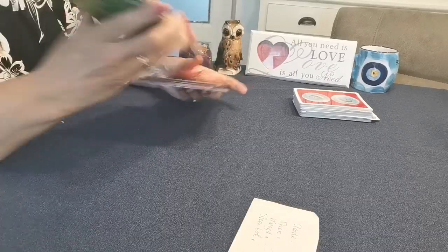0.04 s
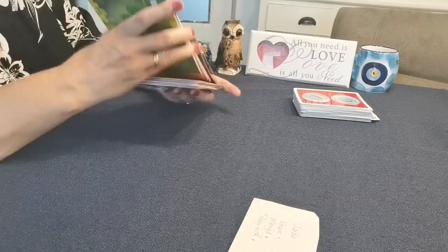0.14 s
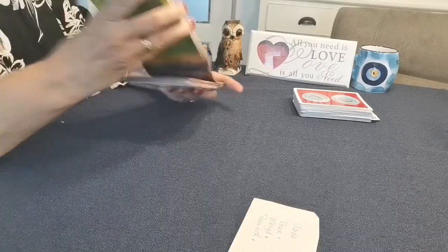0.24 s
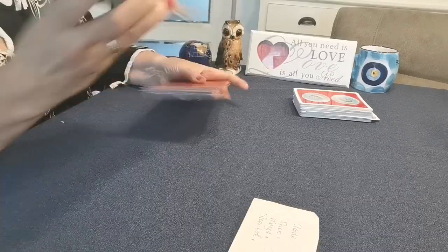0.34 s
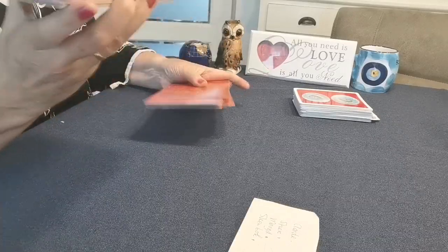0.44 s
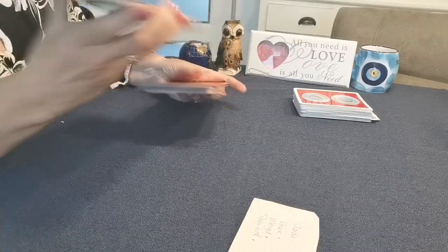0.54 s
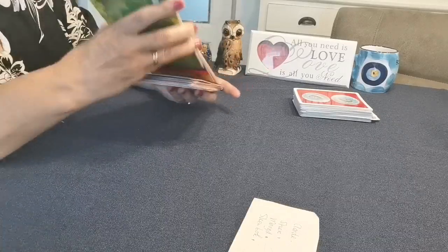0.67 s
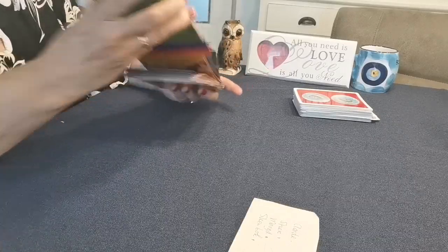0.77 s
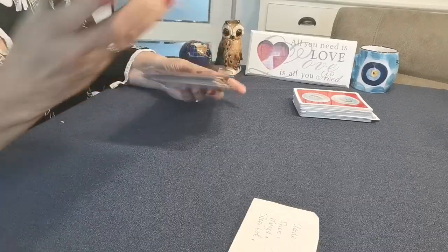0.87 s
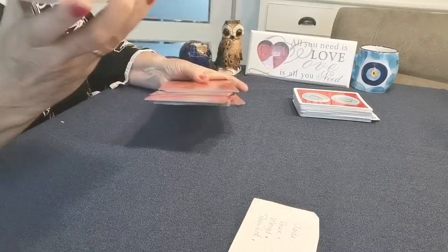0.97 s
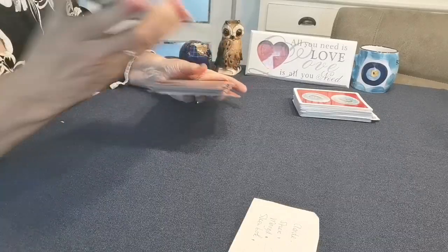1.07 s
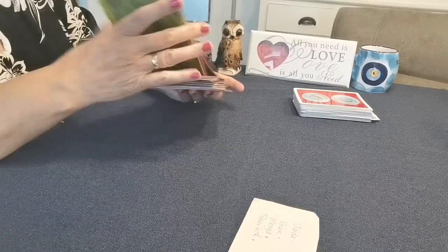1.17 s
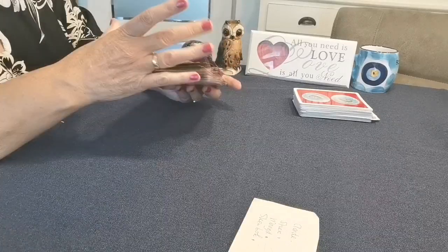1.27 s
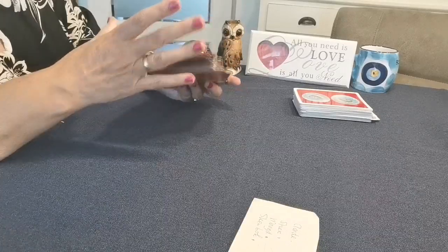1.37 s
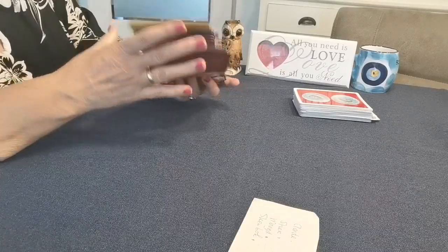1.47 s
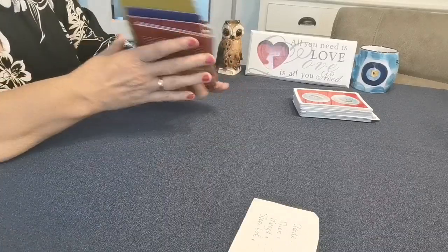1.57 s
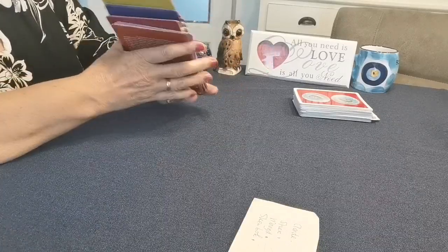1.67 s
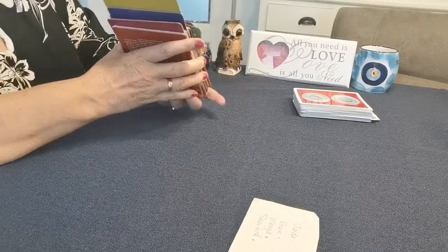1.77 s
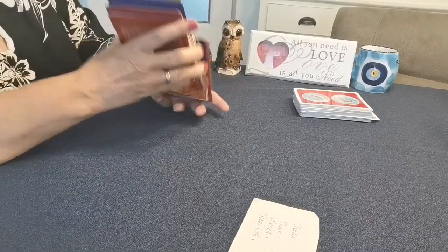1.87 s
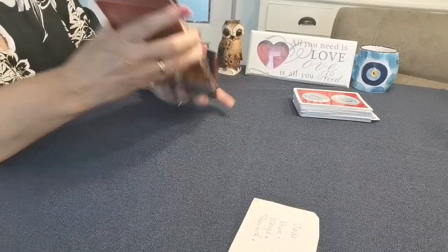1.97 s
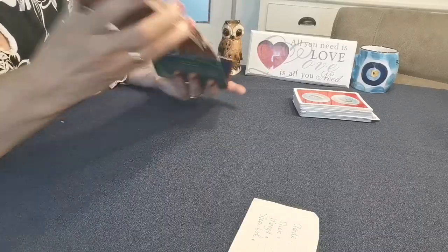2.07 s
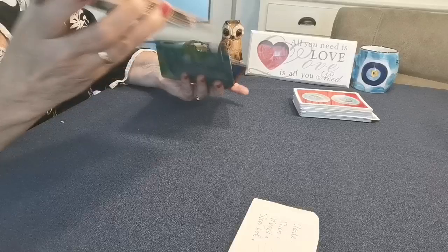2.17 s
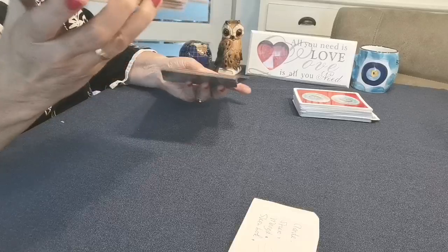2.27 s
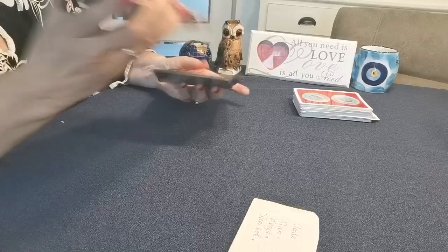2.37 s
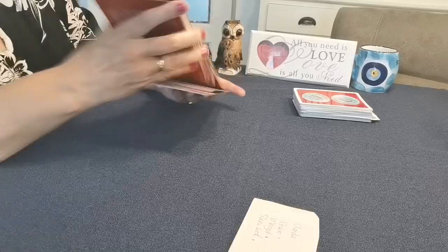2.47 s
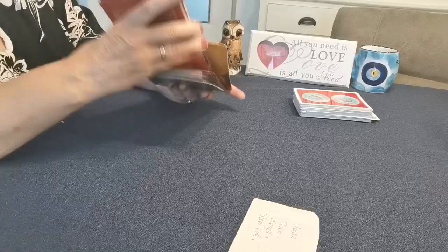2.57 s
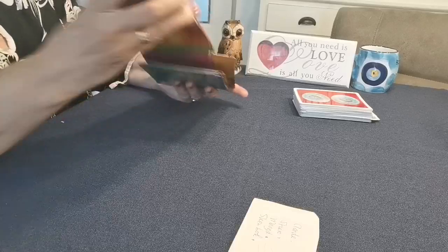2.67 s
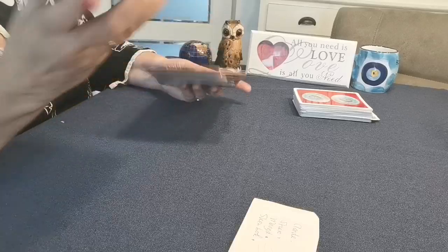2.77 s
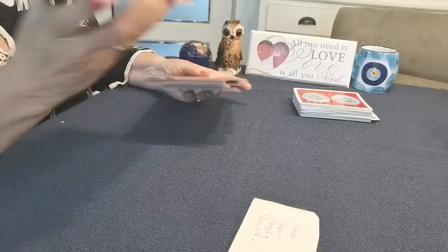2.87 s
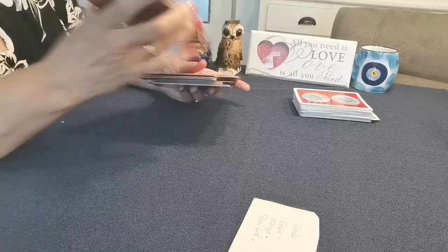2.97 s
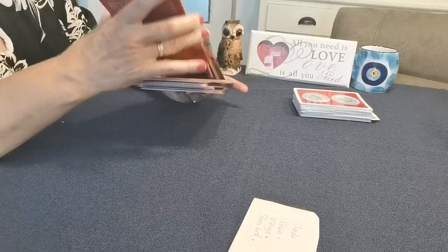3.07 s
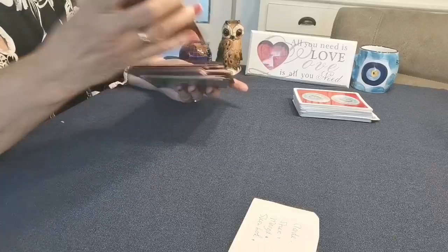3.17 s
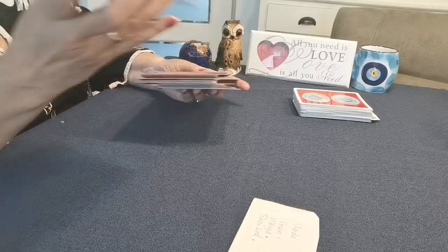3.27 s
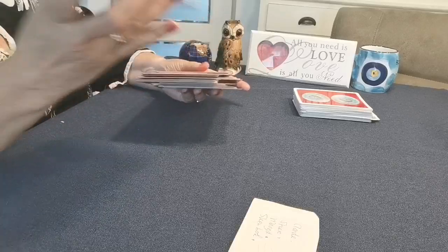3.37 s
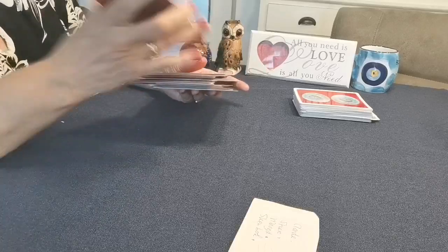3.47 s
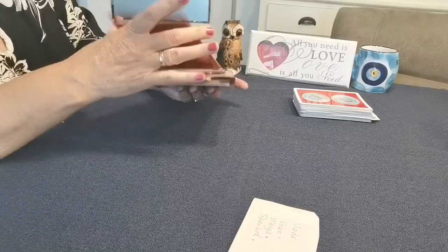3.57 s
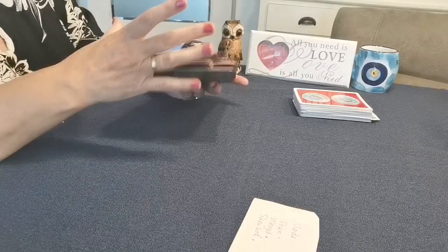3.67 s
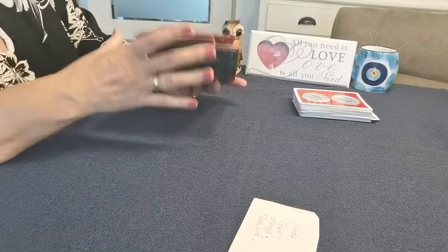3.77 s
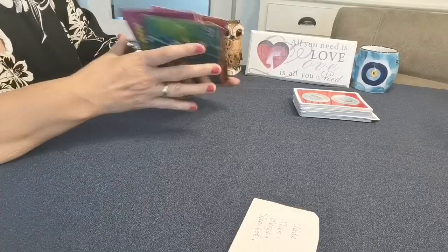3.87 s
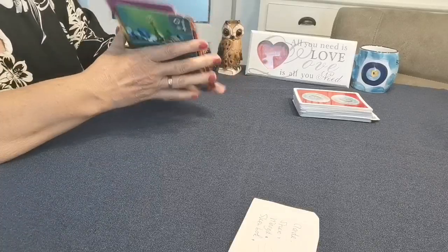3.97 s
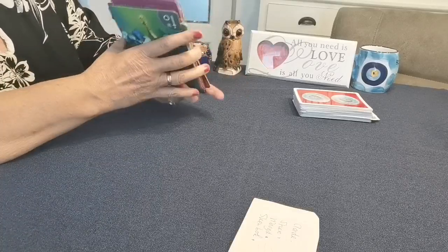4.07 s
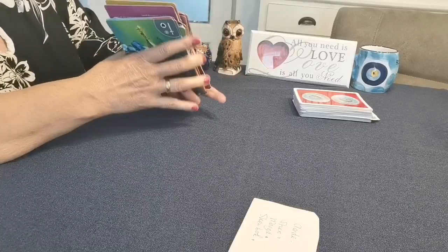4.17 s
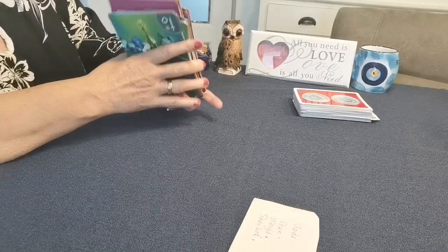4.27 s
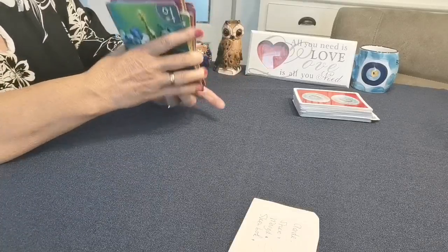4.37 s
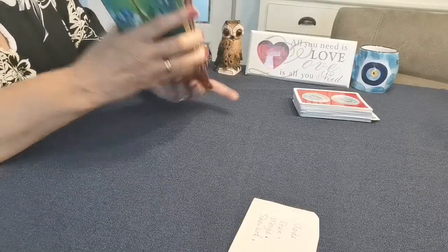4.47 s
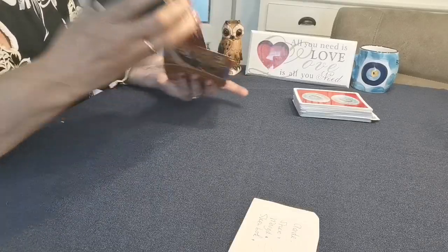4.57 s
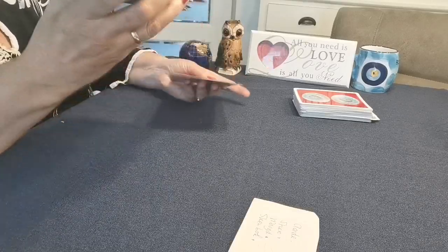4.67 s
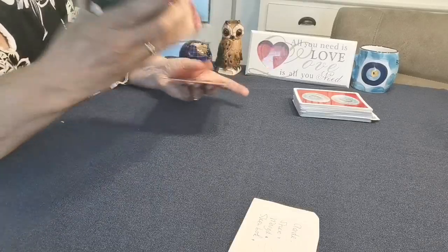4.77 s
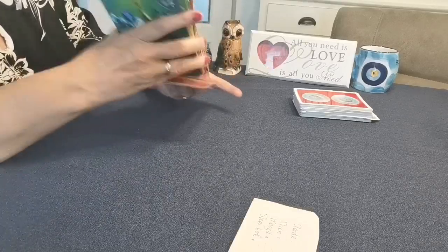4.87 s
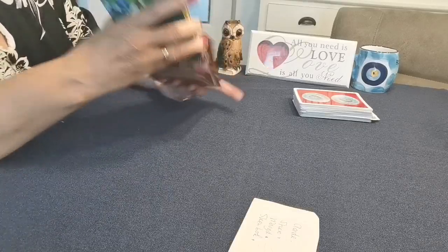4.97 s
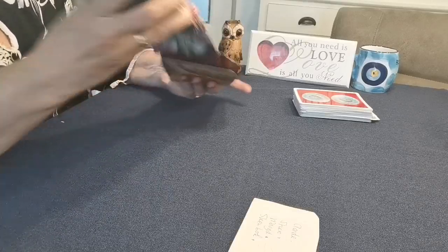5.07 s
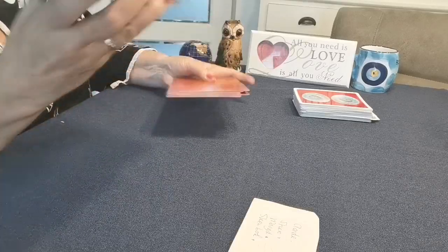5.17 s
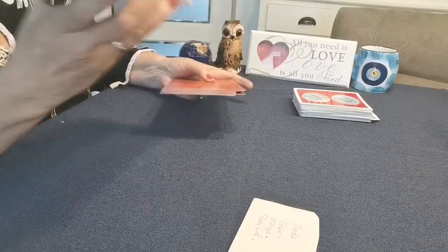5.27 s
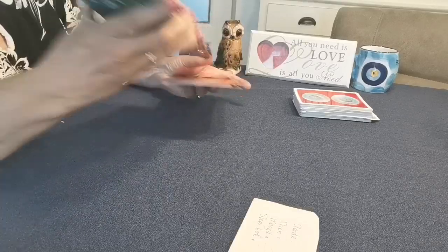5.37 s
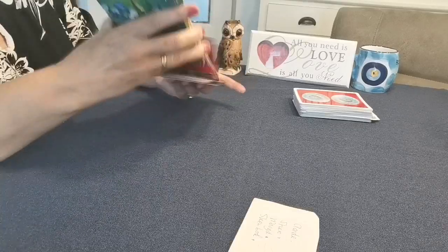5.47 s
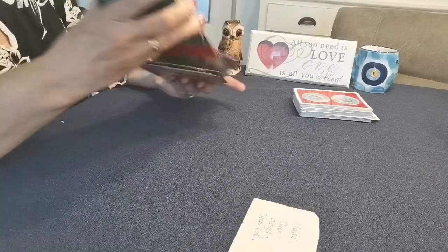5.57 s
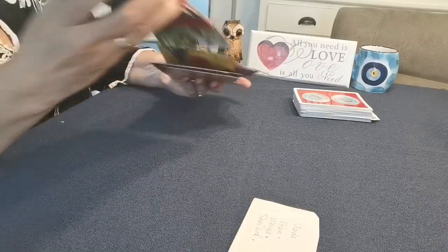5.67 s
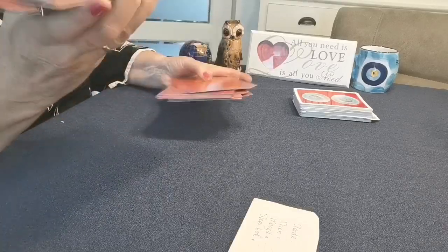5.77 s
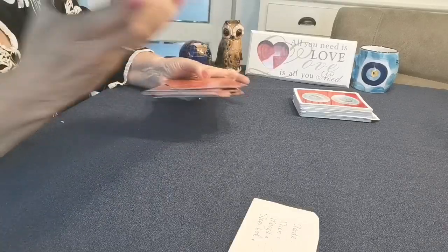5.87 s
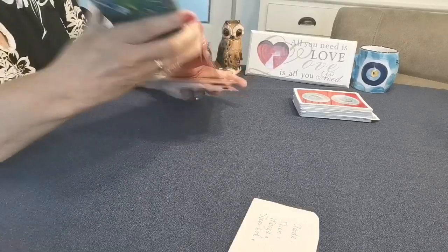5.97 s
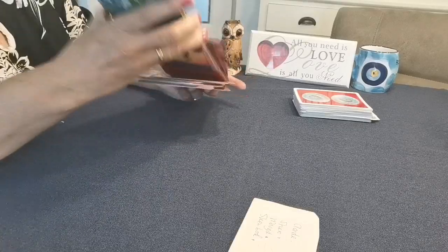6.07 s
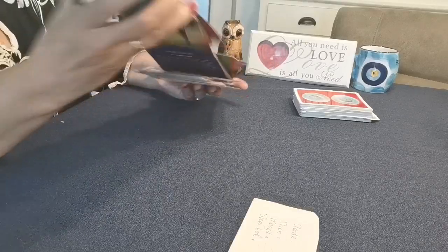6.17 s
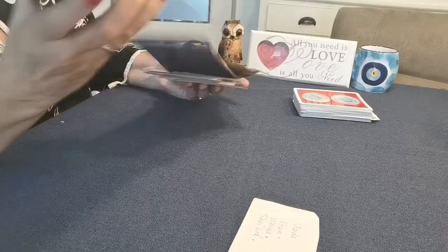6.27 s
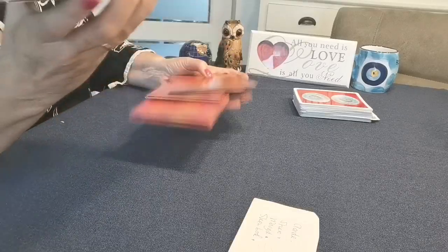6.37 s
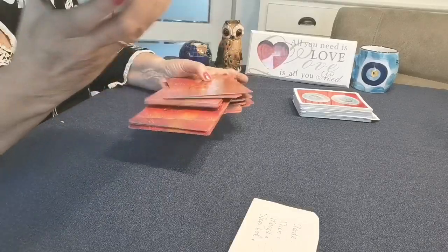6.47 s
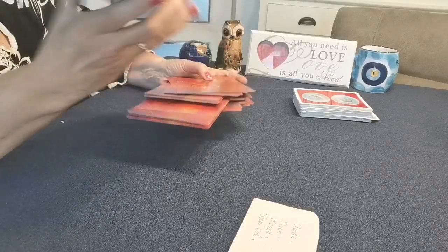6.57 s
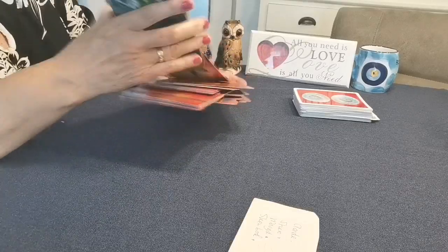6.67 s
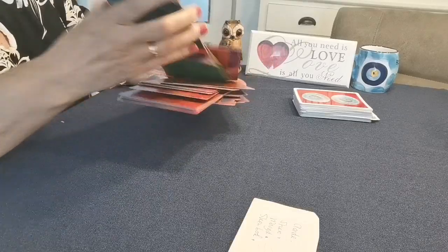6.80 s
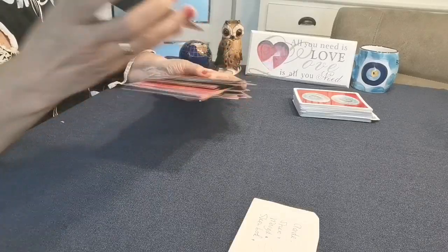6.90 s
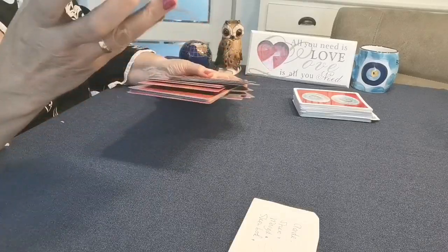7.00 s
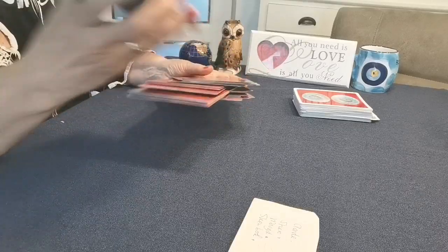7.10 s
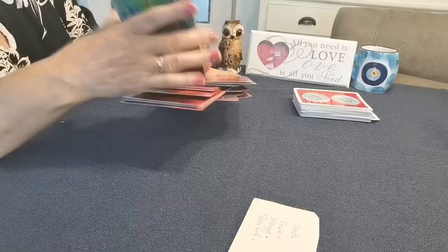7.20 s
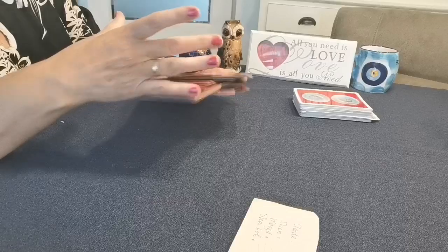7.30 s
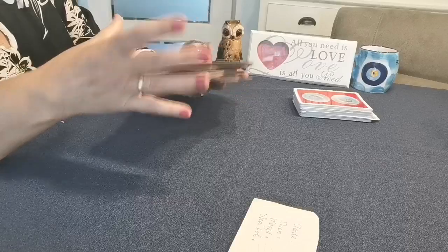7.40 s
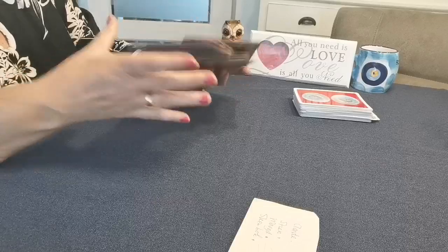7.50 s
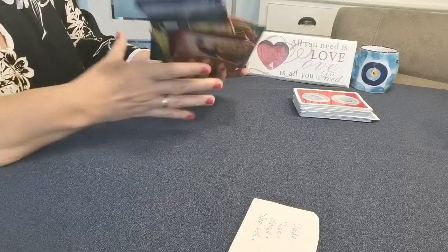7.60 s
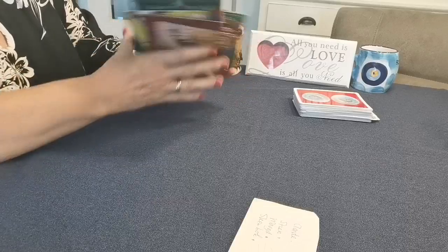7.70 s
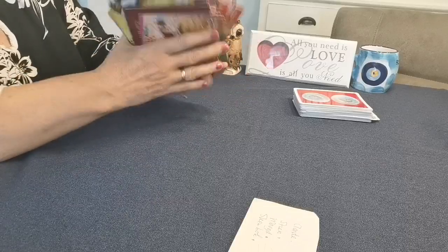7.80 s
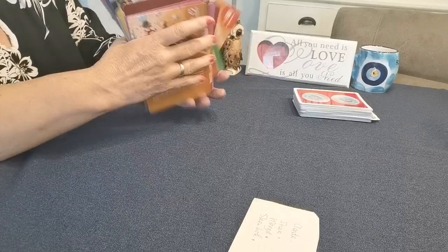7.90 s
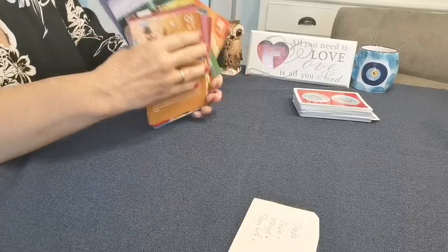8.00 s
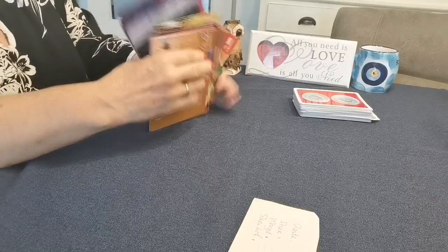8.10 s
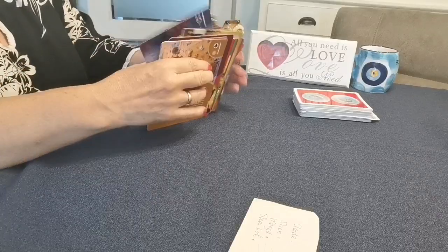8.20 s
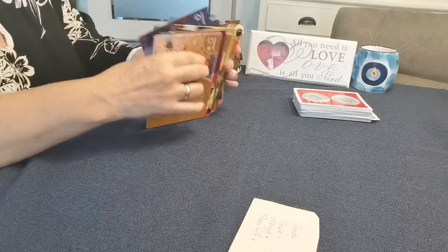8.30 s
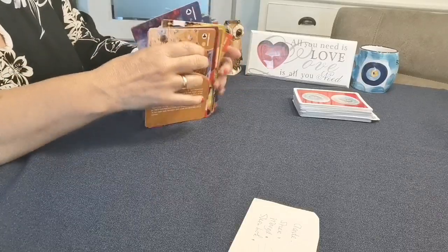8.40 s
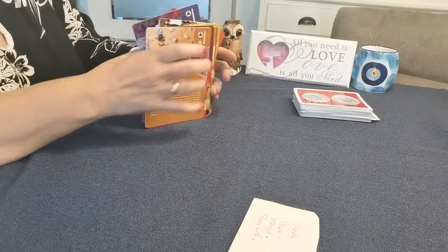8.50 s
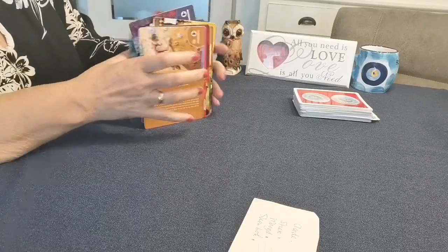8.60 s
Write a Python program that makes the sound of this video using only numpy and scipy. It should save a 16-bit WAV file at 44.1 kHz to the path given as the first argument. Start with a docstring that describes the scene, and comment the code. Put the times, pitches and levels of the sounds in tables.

```python
"""Overhand shuffle, close by

A deck of large coated cards is shuffled overhand, close to a stereo microphone in a furnished room.
Packets slap down as short bursts ringing air, hand and edge; then they slide with a grainy swish of shaped noise.
Edges tick, and knocks ring the dull modes of pile and palm. Faint airy whistles are narrow bands of noise.
Decaying noise makes the reflections of the room; a wavering low hum and steady hiss lie below."""
import sys
import numpy as np
from scipy import signal
from scipy.io import wavfile

SR = 44100
rng = np.random.default_rng(int(sys.argv[2]) if len(sys.argv) > 2 else 0)


def inscribe(sig):
    """Save sig as 16-bit PCM at rate SR to the path in sys.argv[1].

    A 1-D sig is mono; a 2-D sig holds one channel per row.
    Samples are clipped to [-1, 1] before scaling.
    """
    pcm = np.round(np.clip(np.atleast_2d(sig).T, -1, 1) * 32767)
    wavfile.write(sys.argv[1], SR, pcm.astype(np.int16))


N = 381332

# spectrum of coating sliding on coating: (frequency [Hz], relative level [dB per Hz])
SWISH_SPECTRUM = [(900, -28.5), (2000, -2.5), (3000, 1.5), (4500, 3.5), (6500, 3.5), (9000, 13),
                  (11500, 10.5), (15000, 8)]


def from_db(db):
    """Gain of a level."""
    return 10 ** (np.asarray(db) / 20)


def rms_one(x):
    """Scaled to unit power."""
    return x / np.sqrt(np.mean(x ** 2) + 1e-20)


def at_hz(points, hz):
    """A curve over frequency, read on a log-frequency axis."""
    points = np.array(points)
    return np.interp(np.log(hz), np.log(points[:, 0]), points[:, 1])


def sides(pan_db):
    """Left and right gains for a left-right level difference."""
    return from_db(np.array([pan_db / 2, -pan_db / 2]))


def hand_sides():
    """Left and right gains at every sample as the hands move across the microphone pair."""
    # where the hands are: (time [s], left-right difference [dB])
    hand_pan = [(0, -3), (.6, 3.5), (3, 3), (5, 1), (8.65, -1)]
    s, pan_db = np.transpose(hand_pan)
    return sides(np.interp(np.arange(N) / SR, s, pan_db))


def drift(rate_hz):
    """Slow chance of spread 1: noise through two equal low-pass poles, drawn at every eighth sample."""
    r = np.exp(-2 * np.pi * rate_hz * 8 / SR)
    noise = rng.standard_normal((N + SR) // 8 + 2)
    slow = signal.lfilter([1], [1, -2 * r, r * r], noise)[SR // 8:]   # the filter has settled by here
    return np.interp(np.arange(N) / 8, np.arange(len(slow)), rms_one(slow))


def ring(x, hz, t60):
    """A two-pole resonance: a unit click starts a decaying sine of starting height 1."""
    r, w = from_db(-60 / (t60 * SR)), 2 * np.pi * hz / SR
    return signal.lfilter([0, np.sin(w)], [1, -2 * r * np.cos(w), r * r], x + 1e-18)


def coloured(spectrum, grain_db, patchy_db, ticks=0):
    """Stereo noise shaped in half-octaves, lumpy with stick-slip grains and band-wise flicker; rms 1."""
    # how alike the two microphones hear it: (frequency [Hz], left-right correlation)
    likeness = [(30, 0.018), (250, 0.6), (700, 0.13), (2000, 0.025), (5000, 0.085), (12000, 0.03)]
    # balance of the microphone pair: (frequency [Hz], left-right difference [dB])
    tilt = [(60, -2), (180, 0), (550, 0.5), (1650, 1), (4970, -2), (15000, -1)]
    white = (rng.standard_normal((2, 2, N)) + ticks) * from_db(grain_db * drift(240))
    flicker = [drift(17) + 0.4 * drift(4) for _ in range(4)]
    edges = 22 * 2 ** np.arange(0, 10, 0.5)
    out = 0
    for k, (low, high) in enumerate(zip(edges, edges[1:])):
        hz = np.sqrt(low * high)
        level_db = at_hz(spectrum, hz)
        if level_db < -50:   # too faint to matter
            continue
        band = signal.butter(2, [low, high], "band", fs=SR, output="sos")
        mid, side = signal.sosfilt(band, white[k % 2])
        alike = np.clip(at_hz(likeness, hz), -1, 1)
        pair = np.sqrt(1 + alike) * mid + np.sqrt(1 - alike) * side * [[1], [-1]]
        gain = from_db(level_db + patchy_db * flicker[k // 2 % 4])   # neighbouring bands flicker together
        out = out + gain * sides(at_hz(tilt, hz))[:, None] * pair
    return rms_one(out)


def slaps():
    """A click and a brief noise burst ring the air between the cards, thud in the hand and snap at the edge."""
    # slaps and edge ticks: (time [s], level of the air ring [dB], ring of the trapped air [Hz],
    # thud level relative to the air ring [dB], snap level relative to the air ring [dB])
    slap_rows = [(0.224, -33, 755, 9, 9), (0.388, -35.5, 3120, -2, -8), (0.4669, -16.5, 2870, -10.5, -3),
                 (0.4845, -27.5, 596, -7, -20), (0.4862, -24.5, 3060, 3.5, 11.5),
                 (0.4875, -18.5, 9100, -10, -10), (0.4949, -25.5, 930, -29, -20),
                 (0.763, -39, 2200, -14, 4), (0.775, -21.5, 2340, -9.5, 1), (0.819, -31.5, 2280, -30, -6),
                 (0.866, -34.5, 3540, -25, -23), (0.894, -37, 1770, -36, -23), (0.996, -27, 1840, -3.5, 6),
                 (0.999, -34, 3500, -17, -16), (1.0238, -21.5, 4200, -9, -2.5),
                 (1.026, -29.5, 4100, -30, -23), (1.315, -34.5, 3760, -2.5, -12),
                 (1.368, -38, 1200, -5, -6), (1.3725, -36, 810, -5, 17), (1.3789, -30.5, 1310, -21, 7),
                 (1.429, -37.5, 930, 0.5, -14), (1.819, -68.5, 4000, -20, 8),
                 (2.045, -47.5, 4040, -10, 11.5), (2.268, -39, 2880, -35, -11),
                 (2.269, -37.5, 1350, -4.5, 7), (2.345, -55.5, 7640, -32, 12), (2.576, -42, 4470, 6.5, -8),
                 (2.596, -41, 2010, -8, 0), (2.611, -31, 1520, -2.5, 4), (2.8006, -29, 3060, -41, -34),
                 (2.805, -31, 3100, -22, -8), (2.836, -20.5, 1680, -37, -4), (2.842, -29.5, 1460, 3, 4),
                 (2.855, -30.5, 3170, -3, -15), (2.87, -33, 860, -16, -22), (2.948, -39, 2200, -33, -47.5),
                 (3.185, -30.5, 2700, -2, 10), (3.211, -33.5, 2000, -8, -10), (3.276, -38, 900, 0.5, 9),
                 (3.288, -26.5, 720, -11, -30), (3.627, -37.5, 7450, -11, -16), (3.713, -48, 7700, -4, 3),
                 (3.761, -55, 820, 16, -34), (4.476, -50, 1780, 1, -1), (4.539, -50, 1040, -16, -13),
                 (4.716, -30, 2450, -3.5, -25), (4.717, -29.5, 1380, -10.5, 2),
                 (4.7254, -34, 1570, -7, -16), (4.813, -41.5, 1400, -8, -34),
                 (4.9974, -15.5, 2040, -52, -4.5), (4.9976, -16, 3690, -43, -3),
                 (4.998, -29, 1400, -41.5, -30), (4.999, -19, 2240, -43, -30),
                 (5.006, -24.5, 1550, -40, -13), (5.008, -27, 1540, -35, -19),
                 (5.054, -39.5, 7600, -24, 12.5), (5.2224, -29.5, 4000, -41, 10),
                 (5.233, -38.5, 1400, -19, 9), (5.236, -34, 710, -10.5, -8), (5.525, -49, 2790, 6, 20),
                 (5.637, -41, 3530, 6.5, -24), (5.652, -36, 3390, -31, -11), (5.785, -27.5, 2350, -9.5, -1),
                 (5.8183, -26.5, 1800, -8.5, 0), (5.8196, -31, 2700, -8, -7), (5.834, -32.5, 1010, -29, 9),
                 (6.097, -55, 1770, -21, 19.5), (6.169, -50.5, 900, 2.5, -21), (6.219, -41, 3020, -18, 5),
                 (6.263, -39.5, 1770, -9, 8), (6.3, -38.5, 1560, 0.5, -17), (6.377, -24, 2130, -8, -4),
                 (6.39, -35, 2040, -20, 4), (6.412, -44, 2000, -21.5, 7), (6.781, -31.5, 520, -9, -8.5),
                 (6.783, -25, 3300, -26, 2.5), (6.826, -40, 7800, -14, -3), (6.904, -36, 2630, -7.5, -2),
                 (7.003, -53, 596, 3, -18.5), (7.324, -44, 2720, -7.5, -12), (7.431, -51.5, 840, 8, 1),
                 (7.819, -56.5, 1177, 1, -14.5), (7.841, -56, 7460, -33, -1), (7.942, -49, 2490, -20, -6),
                 (7.98, -44, 2060, -1, -10), (8.243, -65, 3000, -20, 4), (8.458, -38.5, 1040, -36, 2),
                 (8.469, -47.5, 3700, 6, -8)]
    air_t60_s = 0.003   # for a pocket ringing at 1500 Hz
    snap_band_hz, snap_s = (1300, 14300), 0.0014   # the crack of the card edge
    out, pan = np.zeros((2, N + SR)), hand_sides()
    t = np.arange(SR // 20) / SR
    click = t == 0
    edge = signal.butter(1, snap_band_hz, "band", fs=SR)
    all_grit = rng.standard_normal((len(slap_rows), 3, len(t)))
    for (s, db, hz, thud_db, snap_db), grit in zip(slap_rows, all_grit):
        shared, apart = grit[0], grit[1:]   # noise common to both sides, and one for each side
        contact = (shared + 0.5 * apart) * np.exp(-t / 0.00056) * 0.12 + click

        t60 = air_t60_s * (1500 / hz) ** 0.3   # small high pockets die sooner
        ringing = ring(ring(contact, hz, t60), hz, t60)   # twice: a soft rise and a narrow band
        overtone = ring(contact, 2.0 * min(hz, 5000), air_t60_s / 2)
        air = ringing / np.abs(ringing).max() + 0.19 * overtone

        push = shared * np.exp(-t / 0.0072) * 0.1 + click
        thud = ring(push, 560, 0.0038) + 0.4 * ring(push, 380, 0.0082) + 0.18 * ring(push, 110, 0.019)

        snap = signal.lfilter(*edge, (shared + apart) * np.exp(-t / snap_s) + 1.4 * click)
        snap = snap / np.abs(snap).max()

        blow = air + from_db(thud_db) * thud + from_db(snap_db) * snap
        at = round(s * SR)
        out[:, at:at + len(t)] += from_db(db) * blow * pan[:, [at]]
    return out[:, :N]


def sliding():
    """Coating rubs on coating with a bright swish while the packet bends with a duller rustle."""
    # spectrum of the bending packet: (frequency [Hz], relative level [dB per Hz])
    flex_spectrum = [(90, -20.5), (200, 1), (500, 4), (1200, 4), (2200, 2.5), (4000, -4.5)]
    scrape_share = 0.39   # weight of the scrapes beside the noise
    split_hz = 5170   # a light touch excites mostly the swish above this, a firm one its body too
    ticks = edge_ticks(per_s=200, size_db=11.5)
    swish = coloured([(300, -85.0)] + SWISH_SPECTRUM, grain_db=0.5, patchy_db=2.5, ticks=ticks)
    swish = swish + scrape_share * scrapes()
    rustle_spectrum = [(40, -61.5)] + flex_spectrum + [(9000, -67.5)]
    rustle = coloured(rustle_spectrum, grain_db=2.5, patchy_db=1.0, ticks=ticks)
    top = signal.sosfilt(signal.butter(3, split_hz, "high", fs=SR, output="sos"), swish)
    body = signal.sosfilt(signal.butter(3, split_hz, "low", fs=SR, output="sos"), swish)
    top_gain, body_gain, rustle_gain = sliding_gains()
    return (top_gain * top + body_gain * body + rustle_gain * rustle) * hand_sides()


def sliding_gains():
    """Gains of swish top, swish body and rustle: jolts start abruptly and fade, rubs are bells; powers add."""
    # a landing jolts the cards into sliding, and the slide dies away:
    # (time [s], swish level before burst and fade [dB], rustle level before burst and fade [dB])
    jolt_rows = [(0, -49, -52), (0.222, -33.5, -50.5), (0.467, -36.5, -39), (.765, -44, -52),
                 (0.772, -33.5, -54.5), (0.995, -44.5, -48), (1.297, -45.5, -57.5), (1.379, -41, -45.5),
                 (2.266, -53, -62), (2.572, -31, -45), (2.834, -38.5, -41), (3.126, -37, -42.5),
                 (3.286, -50, -54.5), (3.625, -50, -67), (3.761, -58.5, -59.5), (4.713, -50, -47),
                 (5.001, -39, -42), (5.234, -47, -50.5), (5.608, -43.5, -52.5), (5.815, -46.5, -50.5),
                 (6.098, -51, -61), (6.378, -49.5, -51), (6.783, -35, -45.5), (7.326, -56, -61),
                 (7.433, -58, -63), (8.455, -56, -60)]
    # fingers push cards along each other, swelling and fading: (peak time [s], half-width to 1/e [s],
    # swish top level [dB], swish body level relative to top [dB], rustle level [dB])
    rub_rows = [(.16, 0.072, -68, 6, -77), (.285, 0.03, -50, 0, -45), (0.342, 0.016, -37.5, 3, -53),
                (.42, 0.056, -38.5, -1.5, -58.5), (.458, 0.011, -33, -8, -48),
                (0.849, 0.022, -43.5, 7, -51.5), (.92, 0.063, -51, 3, -57.5),
                (0.973, 0.0072, -41, 5.5, -69), (0.992, 0.013, -40.5, 2, -63),
                (1.327, 0.014, -30.5, -6, -56), (1.358, 0.019, -45.5, 1, -52.5), (1.78, 0.021, -64, 3, -73),
                (1.87, 0.15, -66.5, -8, -73), (2.032, 0.085, -54.5, 0.5, -69.5),
                (2.176, 0.069, -44.5, -8, -73.5), (2.664, 0.017, -38.5, 3, -47.5),
                (2.77, 0.27, -52, -1, -69), (2.823, 0.019, -40.5, -7, -57.5),
                (3.148, 0.015, -35, 4.5, -42.5), (3.2, 0.03, -42, 3.5, -49), (3.241, 0.019, -36, 5, -58),
                (3.64, 0.0061, -38.5, -3, -69), (3.73, 0.027, -55.5, 0.5, -66),
                (4.06, 0.076, -65, 1.5, -74), (4.15, 0.045, -57, 1, -71), (4.292, 0.073, -60.5, -21, -76),
                (4.419, 0.03, -57, -1, -70), (4.565, 0.011, -41.5, -26, -62),
                (4.642, 0.099, -48, -5.5, -64.5), (4.93, 0.73, -67, -1, -73),
                (5.08, 0.048, -43.5, 5.5, -51.5), (5.201, 0.034, -47, 0, -57.5),
                (5.544, 0.0097, -34, -13, -66), (5.575, 0.02, -45, 4.5, -53),
                (5.631, 0.025, -39.5, 0.5, -52), (5.741, 0.051, -44, -11, -68), (5.8, 0.034, -52.5, 3, -62),
                (6.129, 0.017, -43, 1, -65), (6.219, 0.083, -48, 4, -63.5),
                (6.286, 0.048, -42.5, -1.5, -58), (6.365, 0.029, -53, 10, -69),
                (6.808, 0.0092, -39, 1, -62), (6.845, 0.01, -44, 8.5, -67), (6.944, 0.027, -44.5, 7, -57.5),
                (7.376, 0.02, -49, 5, -66), (7.782, 0.047, -67, 8, -76), (7.862, 0.039, -53.5, 4.5, -62.5),
                (7.97, 0.075, -51.5, 3, -57), (8.078, 0.038, -63.5, 8, -63.5), (8.18, 0.049, -58, 0, -73),
                (8.27, 0.068, -55.5, 4, -73), (8.33, 0.042, -60.5, 4, -63), (8.421, 0.058, -57.5, 0, -65.5),
                (8.55, 0.12, -62.5, 1.5, -71)]
    swish_fade, rustle_fade = 160, 138   # dB per second
    burst_db, burst_s, rise_s = 8.5, 0.0061, 0.0018   # extra level as a jolt starts, its decay, and the rise
    rub_edge = 2.03   # 2 is a Gaussian bell, more has a flatter top and steeper flanks
    power = np.zeros((3, N + 2 * SR))   # a second to spare at either end
    t = np.arange(SR // 2) / SR
    fade_db = -np.outer([swish_fade, swish_fade, rustle_fade], t) + burst_db * np.exp(-t / burst_s)
    jolt = (1 - np.exp(-t / rise_s)) * from_db(fade_db)
    for s, swish_db, rustle_db in jolt_rows:
        at = SR + round(s * SR)
        levels = from_db(np.c_[[swish_db, swish_db, rustle_db]])
        power[:, at:at + len(t)] += (levels * jolt) ** 2
    for s, half_s, swish_db, body_db, rustle_db in rub_rows:
        at = SR + round(s * SR) - len(t) // 2
        bell = np.exp(-np.abs((t - t.mean()) / half_s) ** rub_edge)
        levels = from_db(np.c_[[swish_db, swish_db + body_db, rustle_db]])
        power[:, at:at + len(t)] += (levels * bell) ** 2
    return np.sqrt(power[:, SR:SR + N])


def edge_ticks(per_s, size_db):
    """Single card edges catch and let go at random, as clicks of random size and sign."""
    caught = (rng.random(N) < per_s / SR) * from_db(size_db + 3 * rng.standard_normal(N))
    return caught * rng.choice([-1, 1], (2, N))


def scrapes():
    """The coating catches in clumps; each catch rings a short note set by its spot, to one side or the other."""
    per_s, ring_cycles = 2200, 38   # catches per second before clumping; cycles of a note until 60 dB down
    chance = per_s * from_db(4.0 * drift(40)) / SR
    caught = np.flatnonzero(rng.random(N) < chance)
    size, side, spot = rng.random((3, len(caught)))
    pitches = np.geomspace(1500, 9500, num=16)
    pitch_index = (spot * len(pitches)).astype(int)
    out = 0
    for k, hz in enumerate(pitches):
        mine = pitch_index == k
        heights = from_db(-3.0 * np.log(1.03 - size[mine]))   # mostly small, a few large
        clicks = np.zeros((2, N))
        clicks[:, caught[mine]] = heights * np.sqrt([side[mine], 1 - side[mine]])
        gain = from_db(at_hz(SWISH_SPECTRUM, hz)) * np.sqrt(hz)   # pitches further apart carry more of the band
        out = out + gain * ring(clicks, hz, ring_cycles / hz)
    return rms_one(out)


def knocks():
    """The pile knocks the palm: soft contacts ring the dull modes of both."""
    # knocks: (time [s], level of the contact click [dB])
    knock_rows = [(8, -44), (8.198, -41.5), (8.208, -42.5), (8.231, -59), (8.27, -53), (8.283, -47),
                  (8.298, -49), (8.319, -42), (8.327, -47), (8.368, -51)]
    # modes of pile and palm: (frequency [Hz], level [dB], time to fall by 60 dB [s])
    palm_modes = [(126, -2.5, 0.064), (192, -3.5, 0.054), (367, -1.5, 0.011)]
    clicks = np.zeros(N)
    for s, db in knock_rows:
        clicks[round(s * SR)] = from_db(db)
    # the pile drags on after each knock
    clicks += 0.036 * rng.standard_normal(N) * signal.lfilter([1], [1, -0.999], clicks)
    clicks = signal.lfilter([0.08], [1, -0.92], clicks)   # flesh spreads the contact over a millisecond
    modes = sum(from_db(db) * ring(clicks, hz, t60) for hz, db, t60 in palm_modes)
    return modes * sides(-3.0)[:, None]


def whistles():
    """Faint airy whistles between strokes: short spells of noise in a narrow band that sinks a little."""
    # whistles: (start [s], length [s], middle pitch [Hz], level at the middle [dB])
    whistle_rows = [(1.195, 0.13, 3600, -74), (1.53, 0.16, 4840, -76), (2.44, 0.12, 3740, -79.5),
                    (3.4, 0.1, 4770, -74.5), (3.811, 0.15, 3540, -71.5), (4.039, 0.1, 4650, -71),
                    (7.605, 0.15, 3550, -75)]
    sag, spread_hz = 0.082, 500   # share of the pitch lost over a whistle; drift rate that sets the bandwidth
    t, out = np.arange(N) / SR, np.zeros(N)
    a, b = drift(spread_hz), drift(spread_hz)
    for s, length, hz, db in whistle_rows:
        i = slice(round(s * SR), round((s + length) * SR))
        done = (t[i] - s) / length
        phase = 2 * np.pi * np.cumsum(hz * (1 + sag * (0.5 - done))) / SR
        breath = a[i] * np.sin(phase) + b[i] * np.cos(phase)
        out[i] += from_db(db) * np.sin(np.pi * done) * breath
    return out


def room(x):
    """Dense reflections after a short gap, dying band by band; long waves reach both microphones alike."""
    # reverberation: (frequency [Hz], time to fall by 60 dB [s])
    room_t60 = [(200, 0.38), (1400, 0.31), (4000, 0.4), (10000, 0.36)]
    gap_s, wide_hz = 0.0072, 842   # silence before the first reflection; the tail is wide above wide_hz
    t, tail = np.arange(SR // 2) / SR, 0
    white = rng.standard_normal((2, len(t))) * (t > gap_s)
    for hz in 44 * 2.0 ** np.arange(9):
        octave = signal.butter(2, [hz / 2 ** 0.5, hz * 2 ** 0.5], "band", fs=SR, output="sos")
        mid, side = signal.sosfilt(octave, white)
        width = hz ** 2 / (hz ** 2 + wide_hz ** 2)
        decay = from_db(-60 * t / at_hz(room_t60, hz))
        tail = tail + (mid + width * side * [[1], [-1]]) * decay
    tail = tail / np.sqrt(np.sum(tail ** 2) / 2)
    return signal.fftconvolve(x.mean(axis=0, keepdims=True), tail, axes=1)[:, :N]


def room_tone():
    """Steady air and microphone noise with a low hum that wavers in pitch and level."""
    # spectrum of the hiss: (frequency [Hz], relative level [dB per Hz])
    tone_spectrum = [(25, 3), (40, -2.5), (60, -5.5), (100, -2.5), (300, -10.5), (1200, -21.5),
                     (3000, -21.5), (6000, -26.5), (9000, -31), (15000, -17.5)]
    hiss_db, hum_db = -67.5, -70   # rms of the hiss; rms of the hum before it wavers
    hum_hz, hum_waver_hz = 50, 8   # mean pitch and its spread
    turns = np.cumsum(hum_hz + hum_waver_hz * drift(20.0)) / SR
    hum = np.sqrt(2) * np.sin(2 * np.pi * turns) * from_db(2.5 * drift(9))
    hiss = coloured(tone_spectrum, grain_db=-1.0, patchy_db=0.5)
    return from_db(hiss_db) * hiss + from_db(hum_db) * hum


def scene():
    """Hands and cards, their room sound and the steady background."""
    bass_cut_hz = 143   # hands and cards are too small to radiate below this
    slap_room_db, slap_room_hz = -0.5, 2200   # a crack is beamed: the walls get mostly its body below this
    room_db = -2
    blows = slaps() + knocks()
    rubbing = sliding() + whistles()
    blows = signal.lfilter(*signal.butter(2, bass_cut_hz, "high", fs=SR), blows)
    body = signal.lfilter(*signal.butter(1, slap_room_hz, fs=SR), blows)
    to_walls = from_db(slap_room_db) * body + 0.65 * rubbing
    return blows + rubbing + from_db(room_db) * room(to_walls) + room_tone()


def record(dry):
    """The microphone port rings, the treble steps down above it, the top is cut steeply."""
    port_hz, port_t60_s, port_db = 7970, 0.0046, -26
    step_hz = 8906, 10215   # the response steps down between these edges
    cutoff_hz = 15750   # 60 dB down from here up
    with_port = dry + from_db(port_db) * ring(dry, port_hz, port_t60_s)
    # poles of the lower edge against zeros at the upper edge, with unit gain in the bass
    poles, zeros = [signal.butter(12, hz, fs=SR, output="zpk")[1] for hz in step_hz]
    unit_gain = np.real(np.prod(1 - poles) / np.prod(1 - zeros))
    stepped = signal.sosfilt(signal.zpk2sos(zeros, poles, unit_gain), with_port)
    return signal.sosfilt(signal.cheby2(18, 60, cutoff_hz, fs=SR, output="sos"), stepped)


dry = scene()
out = record(dry)
inscribe(out)
```